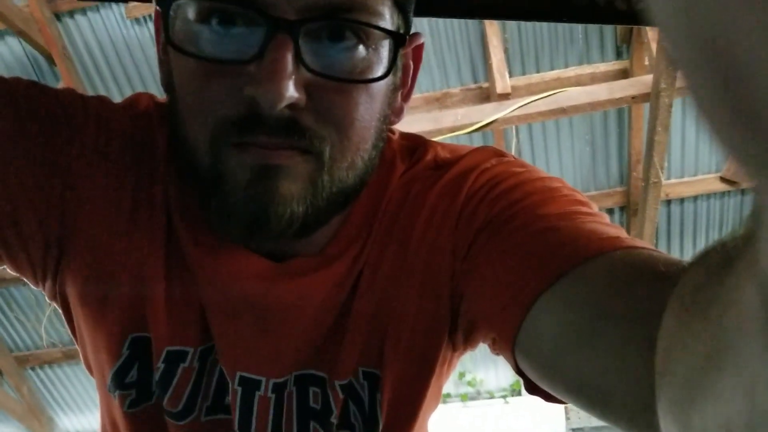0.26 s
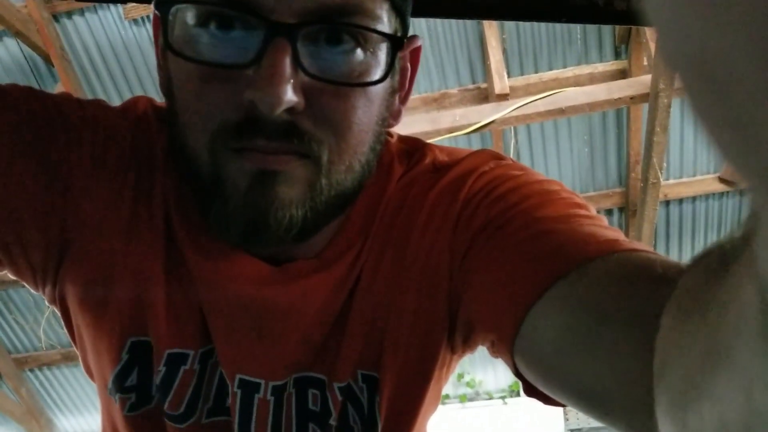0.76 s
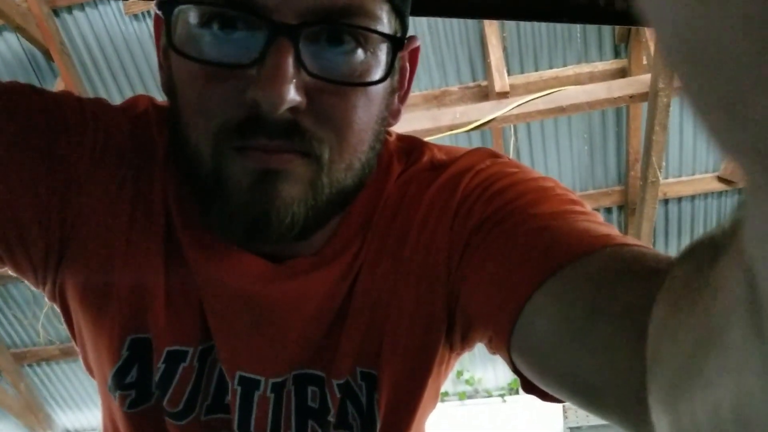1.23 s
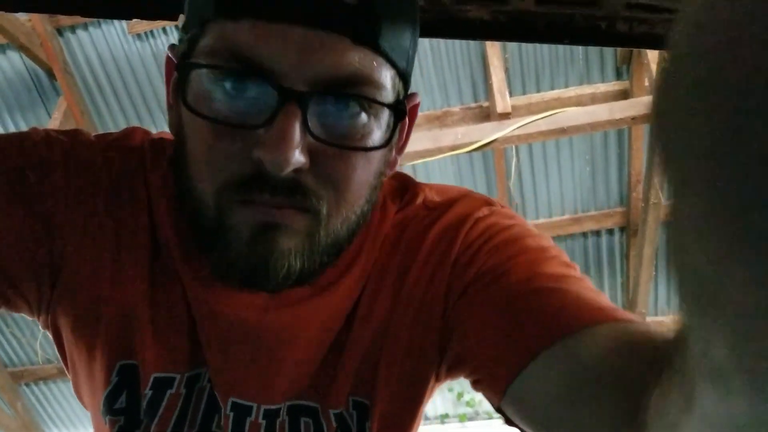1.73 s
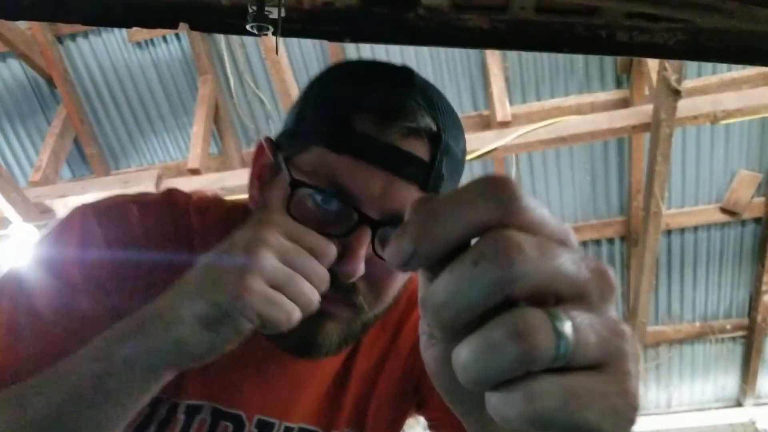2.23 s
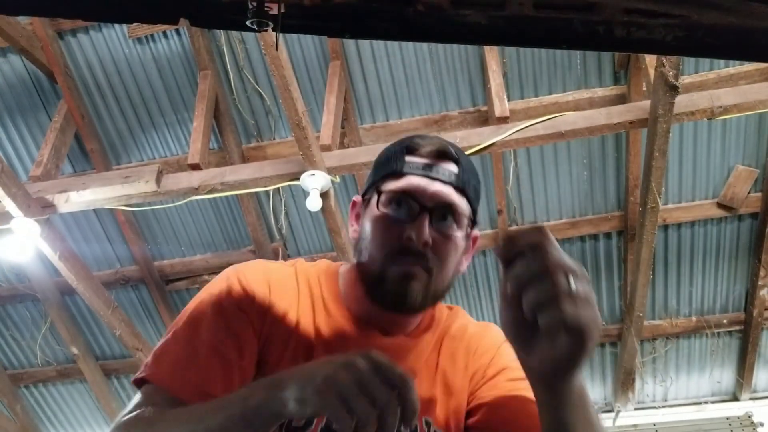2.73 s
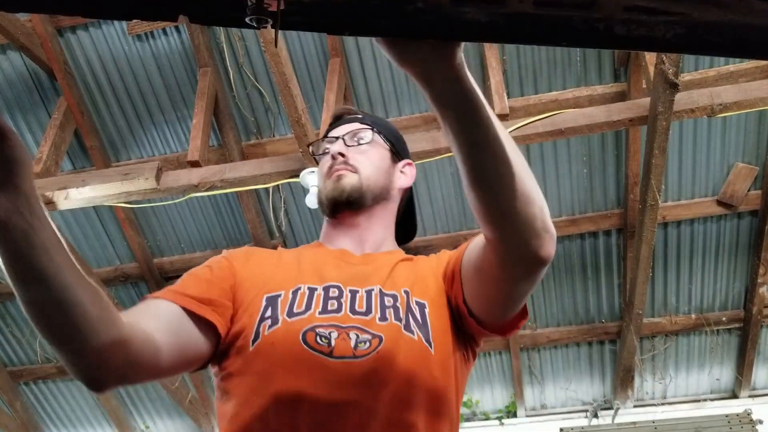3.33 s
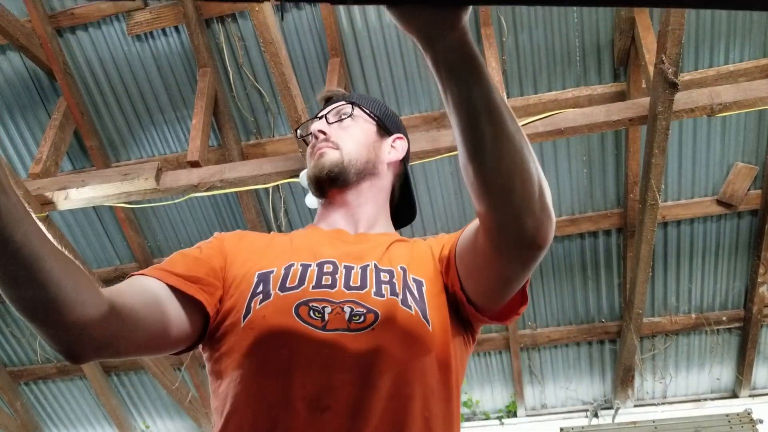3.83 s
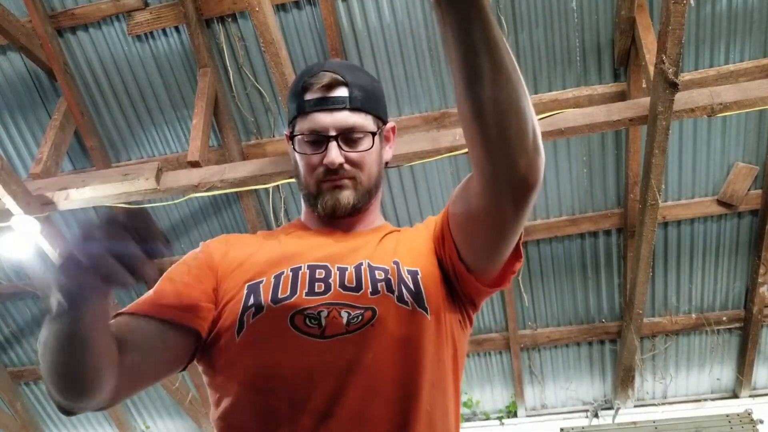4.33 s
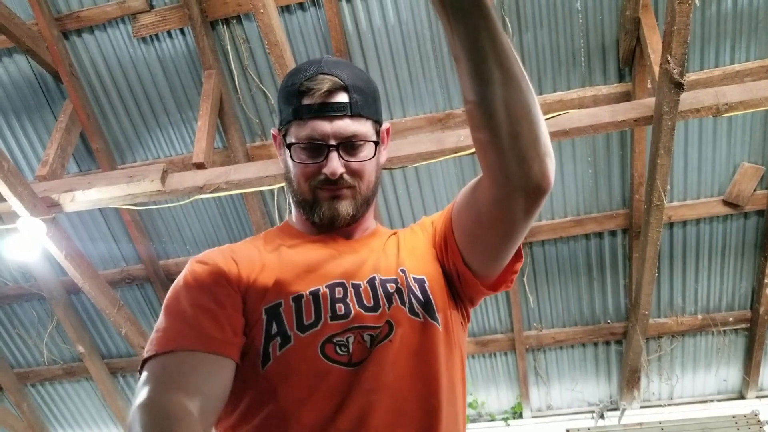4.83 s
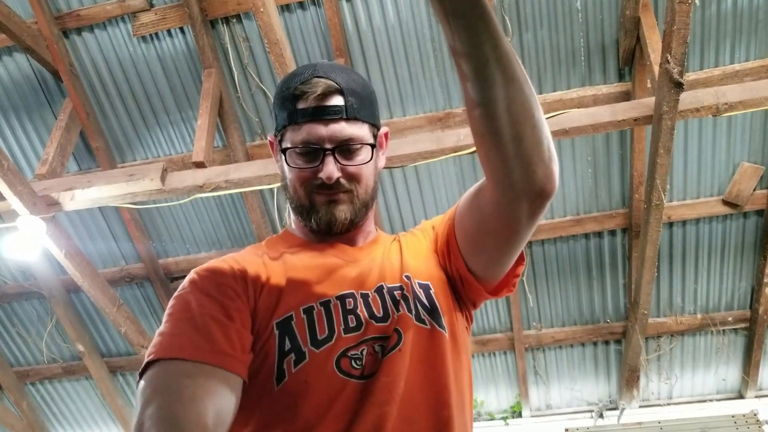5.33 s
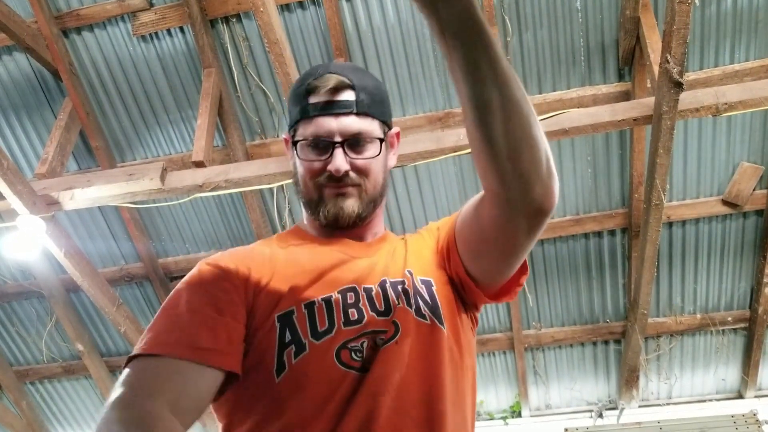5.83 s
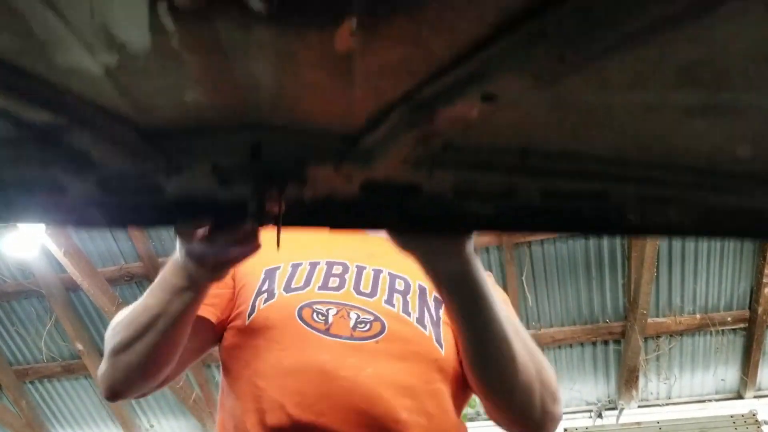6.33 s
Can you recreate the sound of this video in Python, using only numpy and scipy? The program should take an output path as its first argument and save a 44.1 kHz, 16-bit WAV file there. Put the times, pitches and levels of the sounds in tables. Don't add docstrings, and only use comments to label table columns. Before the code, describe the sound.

A faint low distant rumble and thin high insect hiss run throughout an open barn, dimming slightly around 1.5-2 s as a body leans in. From 0 to 0.9 s fingers rub the microphone case very close: breathy hiss, narrow whistling friction, low rumble, dull knocks at 0.3-0.55 s. At 1.0 s it snaps free with a loud cluster of cracks and a thump, then small rubs fade by 1.4 s. Light metal taps come near 2 s; from 2.25 s the hood stirs and the rod scrapes softly. At 3.6 s a hard, booming metal blow rings, with rebounds to 3.8 s. From 4.1 to 5.2 s the rod swings with small rattles, scrapes and clinks. At 5.3 s it snaps sharply into a clip, leaving a thin high ring. From 5.8 s to the end the lowering hood gives hollow booms, low thuds and faint creaky grating.

```python
import sys
import numpy as np
from scipy import signal
from scipy.fft import rfft, irfft, next_fast_len
from scipy.io import wavfile

SR = 44100
rng = np.random.default_rng(int(sys.argv[2]) if len(sys.argv) > 2 else 0)


def volts_from_db(level):
    exponent = np.asarray(level, float) / 20
    return 10 ** exponent


def file_out(sig):
    cols = np.atleast_2d(sig).T
    lim = np.clip(cols, -1, 1)
    pcm = np.round(lim * 32767).astype(np.int16)
    wavfile.write(sys.argv[1], SR, pcm)


N = 289760

# pitch_hz, level_db_per_hz
RUMBLE_COLOUR = [(15, -59), (25, -18), (86, 3), (106, -12), (140, -6), (185, -17.5), (372, -14), (417, -25),
                 (458, -10), (539, -24), (1980, -34), (6500, -43.5), (8450, -82), (14300, -120)]
RUMBLE_DB, INSECT_DB, AIR_DB = -56.5, -75, -82.5
# low_hz, high_hz
INSECT_HZ = (7400, 8200)
# leans in from_s, to_s, steps back from_s, to_s
SHADE_S = (1.2, 1.5, 2.0, 2.3)
INSECTS_SHADED_DB, RUMBLE_SHADED_DB, AIR_SHADED_DB = -8.5, -4, -4.5
# pitch_hz, likeness (1 = same in both)
LIKENESS = [(60, 0.92), (180, 0.82), (550, 0.1), (1650, 0), (4970, 0.0), (15000, 0.53)]
# pitch_hz, left_right_db
LEANING = [(60, -0.5), (180, 0.5), (550, -3.5), (1650, -2.5), (4970, -8), (15000, 13.5)]
BAND_EDGES_HZ = 22 * 2 ** (np.arange(30) / 3)
BARN_T60_S, BARN_CUT_HZ, BARN_DB = 0.55, 6300, -18

# pitch_hz, level_db_per_hz
SKIN_COLOUR = [(590, -36), (1000, -6), (1190, -18), (1500, -5), (1870, -2), (3050, -6.5), (4730, -2.5),
               (7350, -5.5), (8360, -13), (11300, 3), (15500, -11.5)]
# pitch_hz, level_db_per_hz
CASE_COLOUR = [(71, -33), (120, -2), (422, -6), (500, -8), (903, -9.5), (983, -16.5), (1230, -17.5),
               (1500, -23), (1950, -51), (3300, -120)]
# start_s, left_right_db, whistle_hz, treble_db
GRIP = [
    (0, -11.5, 4430, 2),
    (.25, -9.5, 4600, -2.5),
    (.5, -20.5, 4300, -28),
    (.6, -4.5, 5210, -4.5),
    (.8, -6.5, 5620, -3),
    (1.0, -17.5, 4540, -8.5),
    (1.1, -27.5, 3870, -10.5),
    (1.22, -34.5, 5200, -5.5),
    (1.45, -12, 4400, 0),
]
# start_s, length_s, peak_db, share_before_peak
STROKES = [(.045, 0.23, -44, 0.73), (.27, 0.34, -63.5, 0.061), (.345, 0.054, -57, 0.28),
           (.46, 0.022, -61.5, 0.49), (.555, 0.3, -44.5, 0.47), (.86, 0.058, -53, 0.55),
           (.915, 0.068, -48.5, 0.99), (1.015, 0.028, -48, 0.26), (1.055, .016, -56.5, .3),
           (1.1, .1, -68.5, 0.11), (1.08, 0.028, -54, 0.14), (1.195, 0.045, -53.5, 0.46),
           (1.28, 0.03, -61, 0.51)]
SWELL_DB = 11
SET_DOWN_S, LIFT_OFF_S = .005, .014
WHISTLES_FROM_DB = -48.5
SHEEN_HZ, SHEEN_DB = 14600, -7
CASE_GAIN_DB, CASE_SWELL_DB, CASE_LINGERS_S = 3, 5.5, 0.01
HELD_DB, LET_GO_S, LET_GO_DB_PER_S = -56, 0.56, 20
# start_s, peak_db, pitch_hz, left_right_db, t60_ms
TICKS = [(0.029, -55.5, 1300, -17, 40), (0.045, -40.5, 2600, -15, 16), (0.046, -55, 5800, -11, 10),
         (0.0622, -36, 1147, -12.5, 92), (0.3835, -55, 3900, -17, 34.2), (0.5279, -38, 890, -9, 7.1),
         (0.5572, -45, 880, -9, 19), (0.763, -65, 897, 4.5, 29), (0.877, -50.5, 800, -5.5, 90),
         (0.919, -40.5, 2690, -10, 39), (0.9618, -35.5, 5594, -22, 12), (1.4068, -68, 2170, -17.5, 290)]
# start_s, peak_db, pitch_hz, left_right_db, t60_ms
KNOCKS = [(0.043, -40.5, 209, 13, 120), (0.06, -42, 546, -29, 38), (0.282, -26, 230, 8, 100),
          (0.382, -21.5, 146, 7, 18), (0.47, -39.5, 219, 16, 60), (0.527, -22, 260, 16, 44),
          (0.528, -27.5, 724, -15, 20), (0.554, -23.5, 198, 23.5, 27), (0.762, -29.5, 418, -12, 29),
          (0.879, -28, 294, 5, 100), (0.92, -38.5, 250, -15, 26), (0.958, -26.5, 152, 2.5, 38),
          (1.0152, -9.5, 334, 6, 16.5), (1.016, -21, 210, 5, 59), (1.0262, -13, 449, -17.5, 14),
          (1.197, -36, 365, 4, 30)]
# start_s, peak_db, pitch_hz, left_right_db, t60_ms
SNAP = [(.919, -30, 10500, -10, 5), (.921, -44.5, 4570, -11, 33), (.9916, -25.5, 4400, -20, 5.7),
        (.9948, -16, 4800, -30.5, 3), (.9949, -20, 11500, -7, 8.2), (.9964, -9.5, 4000, -25.5, 3.5),
        (1.011, -32, 3000, -25.5, 5), (1.0135, -20, 3900, -14, 4), (1.0136, -22.5, 6800, -15, 3.3),
        (1.0137, -28.5, 10800, -7, 5.6), (1.0265, -37.5, 3900, -14.5, 6.6)]
# start_s, peak_db, pitch_hz, left_right_db, t60_ms
CRACKS = [(.7633, -39, 800, -5, 25), (.8776, -44, 700, -3, 40), (.9917, -37, 2200, -15, 5),
          (.995, -25, 2300, -20, 3), (.9966, -21, 2800, -20, 6), (.9967, -26, 1500, -20, 6),
          (1.0137, -27, 1500, -12, 6), (1.0266, -39, 6500, -10, 6), (4.4628, -46, 12500, 3, 25),
          (4.5741, -40, 1900, -3, 14), (4.7087, -48, 11500, 3, 20), (5.3186, -23, 1700, -3, 14),
          (5.9661, -47, 900, -2, 30)]

# start_s, panel_shake_db, metal_slide_db
MOTION = [(2.12, -69, -74), (2.29, -56, -62.5), (2.5, -52, -60.5), (2.77, -53.5, -69.5), (3.03, -55.5, -74),
          (3.25, -51, -64.5), (3.57, -50.5, -73), (3.64, -28.5, -82), (4.07, -42, -63),
          (4.33, -47.5, -59.5), (4.62, -47, -64), (5.1, -51.5, -65.5), (5.5, -53.5, -61), (5.7, -58.5, -69),
          (5.84, -35.5, -66.5), (6.12, -38.5, -66), (6.3, -32, -61.5), (6.57, -43, -70.5)]
# pitch_hz, width_hz, level_db
BOOM = [(58.4, 35, -22), (101.54, 3.7, -3.5), (130, 68, -1.5)]
# pitch_hz, level_db_per_hz
DRUM_COLOUR = [(76, -30), (130, -49.5), (231, -1), (340, -8.5), (567, -6.5), (756, -14.5), (872, -13.5),
               (1500, -37.5), (1950, -61), (3300, -120)]
DRUM_DB, DRUM_FOLLOWS = -58.5, 0.52
# pitch_hz, level_db_per_hz
SCRAPE_COLOUR = [(530, -39), (900, -14.5), (2410, -2.5), (2920, -24), (3150, -10.5), (4440, 1), (5600, -3),
                 (7000, 1.5), (9100, 0.5), (15400, -120)]
FIZZ_DB = -9.5
# start_s, length_s, peak_db, share_before_peak
SQUEEZE = [
    (4.47, 0.23, -58, 0.83),
    (4.725, 0.054, -56.5, 0.16),
]

# start_s, peak_db, weight_db, edge_db
TOUCHES = [
    (1.9505, -41, -12.5, -25.5),
    (2.0697, -39, -53, -17),
    (2.4997, -47.5, -6, -47),
    (2.7402, -70, -19.5, 2),
    (3.5064, -66, 25, -15.5),
    (5.9986, -65, 14.5, -0.5),
]
# start_s, peak_db, weight_db, edge_db
BLOWS = [
    (3.6107, -11, 0.5, -18),
    (3.6198, -20, -22, -32),
    (3.7244, -30, 6, -23),
    (3.7493, -30, 0.5, -25),
    (3.7644, -28, 7, -20.5),
    (5.3177, -22.5, -5.5, -21),
    (5.3212, -13.5, -1.5, -28),
    (5.329, -19.5, -1, -22),
]
# start_s, peak_db, weight_db, edge_db
RATTLES = [
    (4.1138, -39.5, -39, -54),
    (4.262, -32, -5.5, -12),
    (4.2844, -46, 15.5, -27),
    (4.7086, -44.5, -5, -9),
    (4.7306, -41.5, 0.5, -16),
    (4.814, -43, 2.5, -18),
    (4.874, -44, -2, -35),
    (5.1609, -44, 2, -13),
    (5.544, -42.5, -3.5, -22),
]
# start_s, peak_db, weight_db, edge_db
HOOD_GRAZES = [
    (2.2496, -51, -9, -19),
    (2.584, -41.5, -26, -15),
    (3.27, -50.5, -1, -19),
    (3.5651, -53.5, 17.5, -19),
    (5.7964, -54, -2, -17),
    (5.846, -45, 13.5, -20),
    (6.19, -43.5, 13, -19),
]
# start_s, peak_db, weight_db, edge_db
ROD_GRAZES = [
    (4.082, -45, -12, -32),
    (4.214, -35.5, -4, -19.5),
    (4.4627, -42.5, 9.5, -29),
    (4.539, -42, 2, -10),
    (4.57, -35.5, 6, -45),
    (4.9536, -56, 12.5, -26),
    (5.0495, -47.5, 3.5, -23),
]
# t60_ms, middle_db, touch_ms
KINDS = [
    (94, 0.5, 0.17),
    (128.4, 3.5, 3.9),
    (138.7, 5.5, 0.64),
    (230, -5, 14),
    (206, 2, 10),
]
MIDDLE_FOLLOWS = 0.77
# pitch_hz, level_db_per_hz
SHEET_COLOUR = [(88, -40), (150, -18.5), (624, -9), (702, -10), (979, -16), (1290, -16), (1420, -13),
                (1530, -16.5), (1660, -10.5), (4490, -14), (8900, -14.5), (11700, -16.5), (16000, -40)]
# pitch_hz, t60_factor
LASTING = [(150, 4.2), (500, 2.08), (1500, 1.11), (4000, 0.85), (9000, 0.46), (16000, 0.62)]
STEP = 16
# pitch_hz, width_hz, level_db
PANEL_MODES = [
    [(577, 33, -14), (720, 27, -9), (1497, 32, -30.5), (1810, 25, -33.5), (2395, 200, -9.5),
     (2088, 50, -38), (4600, 140, -1.5), (5880, 120, -2.5), (6640, 630, 7)],
    [(322, 16, -19), (502, 20, -4.5), (703, 19, -7.5), (1290, 19, -13), (1410, 43, -10), (1904, 65, -3.5),
     (1695, 17, -16), (1950, 120, -0.5), (2600, 69, -16), (490, 15, -10.5), (2820, 59, -2), (3540, 21, -12),
     (4290, 42, -6.5), (4800, 120, -29)],
]
# from_s, to_s
ROD_FREE_S = (4.0, 5.7)
HUM = 1.5
# start_s, peak_db, pitch_hz, t60_ms
PINGS = [(2.069, -37, 3770, 19), (2.179, -45.5, 3680, 39), (2.498, -57, 2000, 60), (4.1, -52.5, 2967, 300),
         (4.7292, -49, 4400, 160), (4.813, -40, 4334, 73), (4.9521, -45, 4470, 74),
         (5.1612, -46.5, 4250, 58), (5.8471, -52, 4330, 126), (5.8481, -34, 7170, 27),
         (2.499, -55, 1930, 60), (2.456, -64.5, 2010, 300), (2.513, -47.5, 2210, 50),
           (2.515, -56.5, 3410, 100), (2.587, -57, 2350, 136), (2.588, -48, 4000, 116),
           (3.653, -33, 1710, 140), (3.748, -42, 3420, 200), (3.756, -38, 2290, 120), (3.76, -41, 6250, 60),
           (4.213, -62, 1890, 160), (4.212, -53, 2580, 110), (4.215, -60, 2980, 120),
           (4.212, -39.5, 3900, 28), (4.573, -42.5, 2810, 87), (4.731, -59, 1850, 240),
           (4.815, -51.5, 1830, 170), (5.162, -58.5, 3660, 220)]
PART_CYCLES, PART_NOISE_DB = 18, 4
# start_s, peak_db, pitch_hz, left_right_db, t60_ms
SPRING = [
    (4.262, -42, 12500, 4, 120),
    (5.322, -43, 12460, 4, 560),
]
# start_s, peak_db, pitch_hz, t60_ms
BODY = [
    (3.63, -32.5, 279.7, 1000),
    (5.328, -30.5, 319.6, 610),
    (5.803, -24, 98.5, 460),
]
# start_s, peak_db, pitch_hz, t60_ms
THUDS = [(3.611, -16, 741, 85), (3.613, -29, 417, 140), (3.659, -24, 545, 210), (3.7, -28, 517, 260),
         (3.766, -19.5, 585, 72), (3.8, -31.5, 753, 145), (3.875, -42, 582, 310), (4.269, -35, 328.8, 440),
         (4.294, -31, 326, 190), (4.32, -39.5, 355, 140), (5.838, -36, 560, 115), (5.914, -37.5, 273, 190),
         (5.93, -42.5, 545, 420), (5.966, -63, 790, 89), (6.195, -40.5, 560, 610), (6.195, -42, 707, 100),
         (6.185, -20, 188, 88), (6.247, -27.5, 178, 154), (6.235, -35, 225, 660), (6.421, -25, 91.4, 170),
         (6.199, -29, 101, 260), (6.33, -30.5, 170, 155)]
# start_s, peak_db, pitch_hz, t60_ms
CHIMES = [(3.612, -23, 1543, 104), (3.612, -27.5, 2528, 200), (3.612, -35, 2074, 180),
          (3.612, -27, 897, 180), (3.614, -25, 236.5, 310), (3.625, -35, 1277, 270), (3.69, -30, 692, 260),
          (3.69, -44, 1090, 280), (3.757, -31.5, 1722, 205), (3.762, -29, 511.6, 220),
          (4.213, -49, 1857, 160), (4.275, -38, 776, 280), (4.28, -49, 1292, 340), (4.31, -34.5, 484, 260),
          (4.38, -42.5, 492, 250), (4.465, -42, 1208, 110), (4.468, -46.5, 484, 520),
          (4.573, -51, 680, 130), (4.575, -42.5, 1705, 140), (4.73, -47, 4010, 110), (4.814, -57, 4140, 70),
          (5.322, -28, 1526, 200), (5.322, -31, 2525, 130), (5.322, -27, 2203, 170),
          (5.322, -28, 1807, 140), (5.322, -32, 3130, 110), (5.322, -26, 4410, 80), (5.322, -37, 3900, 110),
          (5.33, -29, 685, 320), (5.54, -56, 2105, 190), (5.86, -51.5, 1200, 140), (5.862, -53, 3010, 75),
          (5.87, -52, 2300, 65), (5.88, -54, 1714, 110), (6.2, -59, 3600, 100), (6.201, -60, 1710, 220),
          (6.21, -58, 2770, 120), (6.25, -56, 1080, 150), (6.31, -49, 704, 160)]
# start_s, peak_db, pitch_hz, t60_ms
SWINGS = [(.081, -46, 81, 740), (.801, -46, 73.4, 500), (2.251, -47.5, 82, 1300), (2.451, -50, 79.6, 780),
          (3.201, -45, 76, 700), (3.561, -40.5, 105.5, 310), (3.6121, -23, 99, 550), (3.681, -29, 139, 250),
          (3.751, -26.5, 105, 610), (4.051, -44, 92.3, 510)]
PARTS_LEFT_DB, BODY_LEFT_DB, CHIMES_LEFT_DB = -8.5, -1.5, -6.5
NOTCH_HZ, NOTCH_WIDTH_HZ, NOTCH_DEPTH = 9150, 3200, 0.67
TOP_HZ = 15900


def rms_one(x):
    return x / np.sqrt(np.mean(x ** 2) + 1e-20)


def in_time(rows):
    s, *columns = np.transpose(rows)
    return [np.interp(np.arange(N) / SR, s, c) for c in columns]


def at_hz(points, hz):
    points = np.array(points)
    return np.interp(np.log(hz), np.log(points[:, 0]), points[:, 1])


def filtered(x, order, hz, kind):
    return signal.sosfilt(signal.butter(order, hz, kind, fs=SR, output="sos"), x)


def pan(x, left_db):
    return np.array([x[0] * volts_from_db(left_db / 2), x[-1] * volts_from_db(-left_db / 2)])


def placed(rows, left_db):
    return [(s, peak_db, hz, left_db, t60_ms) for s, peak_db, hz, t60_ms in rows]


def drift(rate):
    r = np.exp(-80 * np.pi * rate / SR)
    slow = signal.lfilter([1], [1, -2 * r, r * r], rng.standard_normal(N // 40 + 2002))[2000:]
    return np.interp(np.arange(N) / 40, np.arange(len(slow)), rms_one(slow))


def ring(clicks, hz, t60):
    r = volts_from_db(-60 / (max(t60, .001) * SR))
    w = 2 * np.pi * hz / SR
    return signal.lfilter([0, np.sin(w)], [1, -2 * r * np.cos(w), r * r], clicks + 1e-18)


def bands(gain_at, span_hz, alike=1.0, grain_db=0.0, size=N):
    out = np.zeros((2, N))
    grains = volts_from_db(grain_db * np.minimum(rng.exponential(1, size), 4))
    white = rng.standard_normal((2, 2, size)) * grains
    for k, (low, high) in enumerate(zip(BAND_EDGES_HZ, BAND_EDGES_HZ[1:])):
        hz = np.sqrt(low * high)
        if span_hz[0] < hz < span_hz[1]:
            mid, side = filtered(white[k % 2], 2, [low, high], "band")
            share = np.clip(alike * at_hz(LIKENESS, hz), -1, 1)
            pair = np.sqrt(1 + share) * mid + np.sqrt(1 - share) * side * [[1], [-1]]
            out[:, :size] += gain_at(hz)[:size] * pan(pair, at_hz(LEANING, hz))
    return out


def coloured(spectrum, span_hz, patchy_db, alike=0.93, grain_db=0.0, size=N):
    together = drift(60)

    def flicker(hz):
        return volts_from_db(at_hz(spectrum, hz) + patchy_db * (.6 * together + drift(6)))
    return rms_one(bands(flicker, span_hz, alike, grain_db, size)) * np.sqrt(size / N)


def strokes(rows, swell_db, fade_s):
    t, power = np.arange(N) / SR, 1e-12
    for s, length, peak_db, share in rows:
        peak_s = s + length * np.clip(share, .05, .95)
        shape_db = np.interp(t, [s, peak_s, s + length], [-swell_db, 0, -swell_db])
        set_down = np.clip((t - s) / SET_DOWN_S + 1, 0, 1)
        lift_off = np.exp(-np.maximum(t - s - length, 0) / fade_s)
        power = power + (volts_from_db(peak_db + shape_db) * set_down * lift_off) ** 2
    return np.sqrt(power)


def taps(events, soft, noisy_db, wide_db, cycles=3.2):
    long = max(e[4] for e in events) > 300
    out, t = np.zeros((2, N)), np.arange(SR // 4 * (3 if long else 1)) / SR
    noise = rng.standard_normal((len(events), len(t)))
    for (s, peak_db, hz, left_db, t60_ms), puff in zip(events, noise):
        near = rms_one(ring(puff, hz, cycles / hz))
        fade = volts_from_db(-60e3 * t / max(t60_ms, 2)) * (1 - np.exp(-t * hz / soft))
        tone = np.sin(2 * np.pi * hz * t)
        wave = volts_from_db(peak_db) * fade * (tone + volts_from_db(noisy_db) * near + volts_from_db(wide_db) * puff)
        at = round(s * SR)
        out[:, at:at + len(t)] += pan([wave], left_db)[:, :N - at]
    return out


def background():
    def band(edges):
        return rms_one(filtered(rng.standard_normal((2, N)), 3, edges, "band"))
    shade = np.interp(np.arange(N) / SR, SHADE_S, [0, 1, 1, 0])
    insects = volts_from_db(INSECT_DB + 9.5 + 1.1 * drift(6.9)) * band(INSECT_HZ)
    air = volts_from_db(AIR_DB) * band((9800, 12000))
    rumble = volts_from_db(RUMBLE_DB + RUMBLE_SHADED_DB * shade) * coloured(RUMBLE_COLOUR, (22, 7000), 0.67, alike=1.0)
    return rumble + volts_from_db(INSECTS_SHADED_DB * shade) * insects + volts_from_db(AIR_SHADED_DB * shade) * air


def barn(x):
    size = next_fast_len(N + SR)
    w = 2 * np.pi * np.arange(size // 2 + 1) / size
    dull = 1 / (1 + 1j * w * SR / (2 * np.pi * BARN_CUT_HZ))
    lags = rng.uniform(.02, .06, (2, 8)) * SR
    loops = [[volts_from_db(-60 * d / SR / BARN_T60_S) * dull * np.exp(-1j * w * d) for d in side] for side in lags]
    echo = [sum((-1) ** k * g / (1 - g) for k, g in enumerate(side)) for side in loops]
    return irfft(rfft(x.mean(axis=0), size) * np.array(echo), size)[:, :N]


def rubbing():
    left_db, whistle_hz, treble_db = in_time(GRIP)
    t = np.arange(N) / SR
    sliding = strokes(STROKES, SWELL_DB, LIFT_OFF_S)
    firm = np.minimum(sliding / volts_from_db(WHISTLES_FROM_DB), 1)

    narrow = filtered(rng.standard_normal((2, 2, N)), 3, 480, "low")
    whistle_turn = np.exp(2j * np.pi * np.cumsum(whistle_hz) / SR)
    whistle = rms_one(np.real((narrow[0] + 1j * narrow[1]) * whistle_turn))
    sheen_turn = np.exp(2j * np.pi * SHEEN_HZ * t)
    sheen = rms_one(np.real((narrow[1] + 1j * narrow[0, ::-1]) ** 2 * sheen_turn))

    skin = coloured(SKIN_COLOUR, (1000, 17000), 3.5, alike=-0.14, grain_db=4.5, size=2 * SR)
    treble = filtered(skin, 4, 8500, "high") + volts_from_db(SHEEN_DB) * sheen * firm
    hiss = filtered(skin, 4, 8500, "low") + volts_from_db(treble_db + 1.5 * drift(25)) * treble
    hiss = hiss + volts_from_db(-1.0 + 1.7 * drift(30)) * whistle * firm

    held = volts_from_db(HELD_DB - LET_GO_DB_PER_S * np.maximum(t - LET_GO_S, 0))
    pressed = np.hypot(held, volts_from_db(CASE_GAIN_DB) * strokes(STROKES, CASE_SWELL_DB, CASE_LINGERS_S))
    rumble = coloured(CASE_COLOUR, (110, 1500), 2.2, alike=.1, size=2 * SR)
    rumble = rumble * pressed * np.clip((1.67 - t) / 0.065, 0, 1)
    return pan(hiss, left_db) * sliding + rumble


def moving_hood():
    boom_db, scrape_db = in_time(MOTION)
    shake = rng.standard_normal((2, N))
    shake[1] = 1.07 * shake[0] + 0.3 * shake[1]
    boom = sum(volts_from_db(db) * rms_one(ring(shake, hz, 2.0 / width_hz)) for hz, width_hz, db in BOOM)
    boom = rms_one(boom) * volts_from_db(boom_db - 3.0)
    drum = coloured(DRUM_COLOUR, (130, 1500), 4.6) * volts_from_db(DRUM_DB - 6.5 + DRUM_FOLLOWS * (boom_db + 51.5))
    scrape = coloured(SCRAPE_COLOUR, (900, 8000), 1.6, grain_db=4.5) * volts_from_db(scrape_db + 2)
    fizz = coloured([(9500, 15.0), (12000, 18.0), (16000, -9.0)], (9000, 17000), 1.6, grain_db=7.5)
    slipping = np.hypot(volts_from_db(scrape_db + FIZZ_DB), strokes(SQUEEZE, 7.9, LIFT_OFF_S))
    fizz = fizz * slipping * volts_from_db(2.0)
    started = np.clip((np.arange(N) / SR - MOTION[0][0]) / 0.058, 0, 1)
    return (boom + drum + scrape + fizz) * started


def contacts():
    tables = (TOUCHES, BLOWS, RATTLES, HOOD_GRAZES, ROD_GRAZES)
    return np.transpose([row + kind for rows, kind in zip(tables, KINDS) for row in rows])


def hit_colour(hz):
    _, peak_db, weight_db, edge_db, _, middle_db, _ = contacts()
    middle_db = middle_db + MIDDLE_FOLLOWS * weight_db
    tilt_db = [at_hz([(600, low + 2.5), (1400, mid + 3), (2800, 0.0063), (6500, 0.011), (10500, high + 19)], hz)
               for low, mid, high in zip(weight_db, middle_db, edge_db)]
    return peak_db + tilt_db


def clatter():
    s, _, _, _, t60_ms, _, touch_ms = contacts()[:, :, None]
    t60, touch_s = t60_ms / 1000, touch_ms / 1000
    coarse = np.arange(0, N + STEP, STEP)
    since_s = np.arange(SR // STEP)[None] * STEP / SR
    at = (s * SR / STEP).astype(int) + np.arange(SR // STEP)

    def envelope(hz):
        rise = 1 - np.exp(-since_s / (touch_s + 1.2 / hz))
        lost_db = -60 * since_s / (t60 * at_hz(LASTING, hz))
        fade = volts_from_db(lost_db) + volts_from_db(lost_db / 3.98 - 14.0)
        power = (volts_from_db(hit_colour(hz))[:, None] * rise * fade) ** 2
        total = np.bincount(at.ravel(), power.ravel(), len(coarse))[:len(coarse)]
        return np.interp(np.arange(N), coarse, np.sqrt(total)) * volts_from_db(at_hz(SHEET_COLOUR, hz) + 7.0)
    return bands(envelope, (140, 17000), grain_db=2.0)


def ringing(shaking):
    s, out = contacts()[0], np.zeros((2, N))
    n = np.arange(900)
    chatter = rng.standard_normal(900) * volts_from_db(-30 * n / 900) * (rng.random(900) < .04)

    def free(when_s):
        return (when_s > ROD_FREE_S[0]) & (when_s < ROD_FREE_S[1])
    now = free(np.arange(N) / SR)
    for modes, struck, shaken in zip(PANEL_MODES, (~free(s), free(s)), (~now, now)):
        luck_db = rng.normal(0, 2.2, (len(s), len(modes)))
        for k, (hz, width_hz, level_db) in enumerate(modes):
            width_hz = max(width_hz, 24)
            clicks = shaking * shaken * width_hz * HUM / SR
            clicks[(s * SR).astype(int)] += volts_from_db(hit_colour(hz) + level_db - 9 + luck_db[:, k]) * struck
            heard = abs(chatter @ np.exp(-2j * np.pi * hz / SR * n))
            even = max(heard, .7 * np.linalg.norm(chatter))
            rung = ring(clicks / even, hz, 4 / width_hz)
            flip = -1 if k % 3 == 1 and hz > 600 else 1
            out += pan([rung], at_hz(LEANING, hz) + rng.normal(0, 6.5)) * [[1], [flip]]
    return signal.fftconvolve(out, chatter[None])[:, :N]


def scene():
    snap = -taps(SNAP, .3, -16, -13)
    knocks = taps(KNOCKS, .9, -8, -45)
    handling = rubbing() + taps(TICKS, 0.12, 1.5, -36.0) + snap + knocks
    handling = filtered(handling, 2, 70, "high")

    noisy, moving = clatter(), moving_hood()
    parts = taps(placed(PINGS, PARTS_LEFT_DB), 16.7, PART_NOISE_DB, -53.0, cycles=PART_CYCLES)
    spring = taps(SPRING, 11, -21.5, -46)
    metal = filtered(noisy + ringing(noisy[1]) + parts + spring, 3, 190, "high")
    metal = metal + taps(placed(BODY + THUDS, BODY_LEFT_DB), 1.8, -4.0, -80.5)
    room, far = barn(metal), background()

    chimes = taps(placed(CHIMES, CHIMES_LEFT_DB), 4.0, -12.5, -57.5)
    swings = taps(placed(SWINGS, BODY_LEFT_DB), 1.0, -10.5, -91)
    cracks = taps(CRACKS, .4, -3.0, -22)
    return handling + cracks + metal + chimes + swings + volts_from_db(BARN_DB) * room + moving + far


def band_limit(x):
    return signal.sosfilt(signal.butter(12, 16800, fs=SR, output="sos"), x)


def record(dry):
    dip = signal.lfilter(*signal.iirpeak(NOTCH_HZ, NOTCH_HZ / NOTCH_WIDTH_HZ, fs=SR), dry)
    heard = filtered(dry - NOTCH_DEPTH * dip, 2, 38, "high")
    overloaded = 1.433 * np.tanh(heard / 1.572)
    mix = signal.sosfilt(signal.cheby2(8, 30, TOP_HZ + 450, fs=SR, output="sos"), overloaded)
    return band_limit(mix)


dry = scene()
out = record(dry)
file_out(out)
```